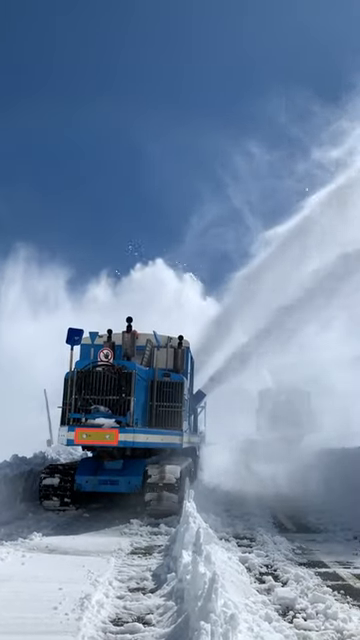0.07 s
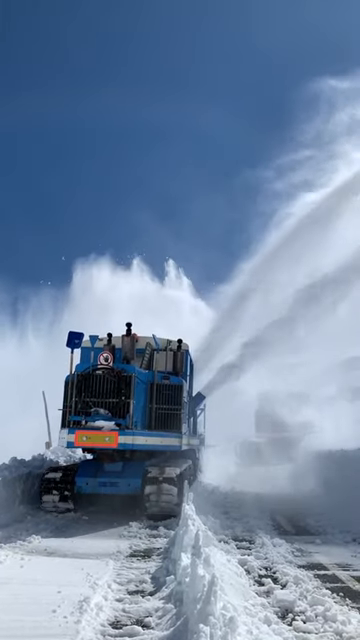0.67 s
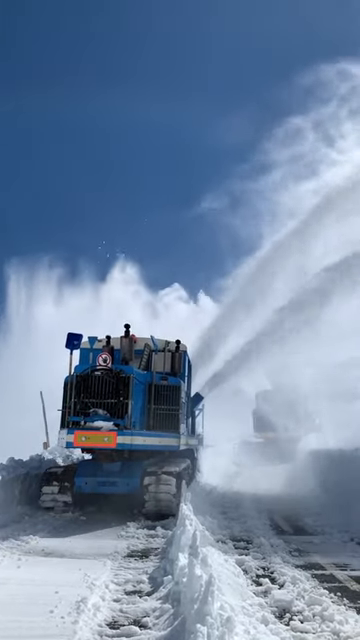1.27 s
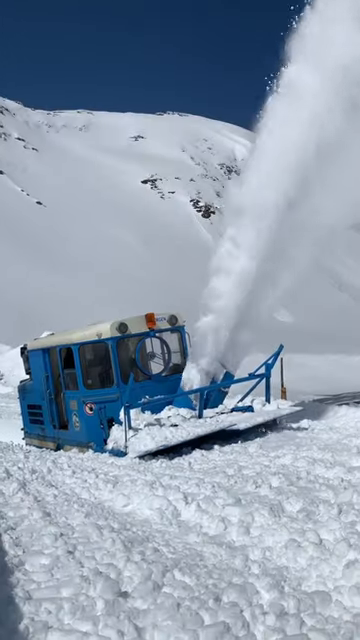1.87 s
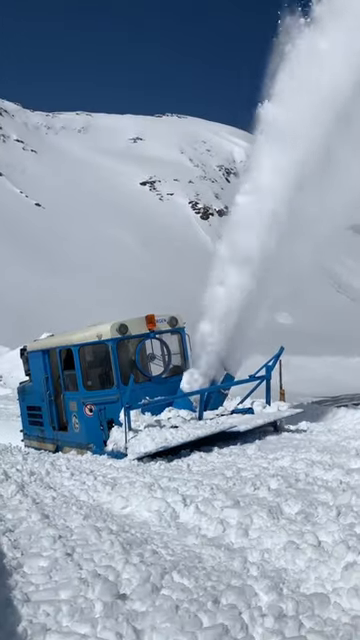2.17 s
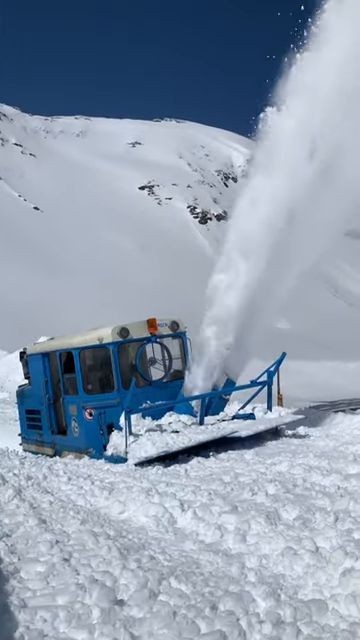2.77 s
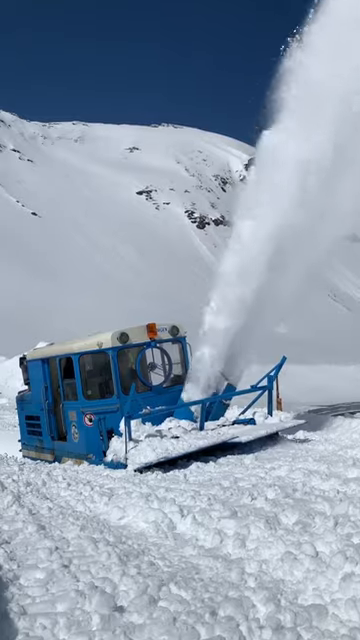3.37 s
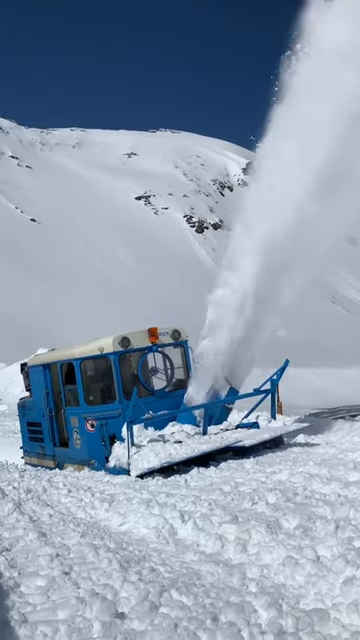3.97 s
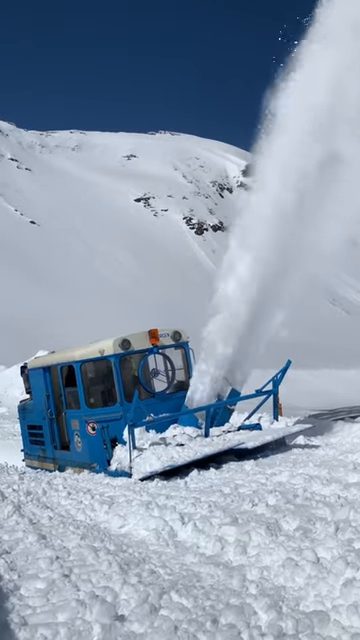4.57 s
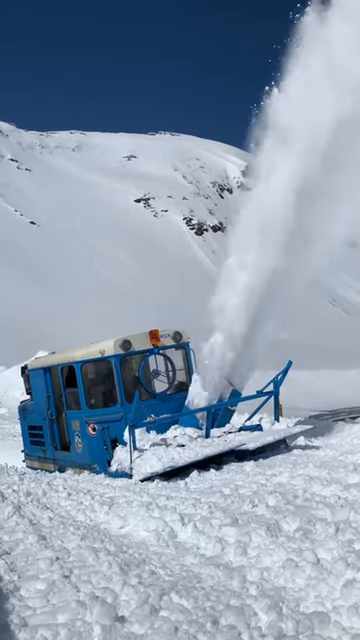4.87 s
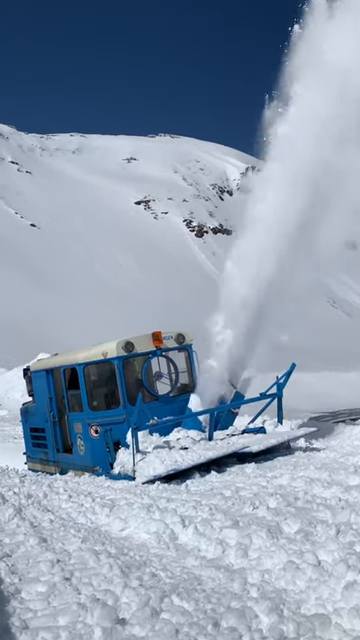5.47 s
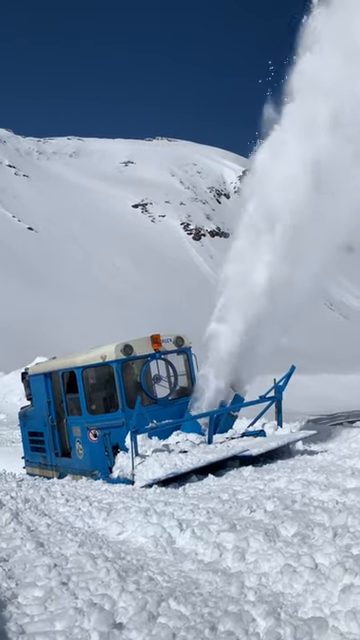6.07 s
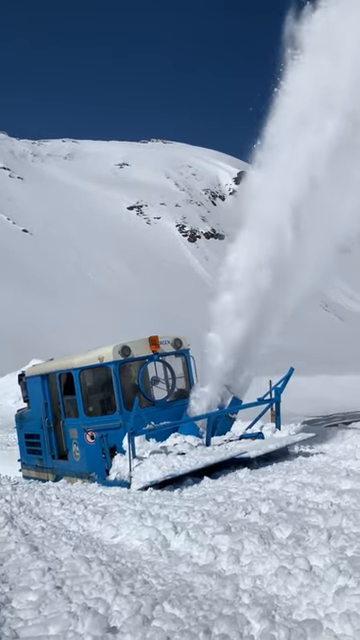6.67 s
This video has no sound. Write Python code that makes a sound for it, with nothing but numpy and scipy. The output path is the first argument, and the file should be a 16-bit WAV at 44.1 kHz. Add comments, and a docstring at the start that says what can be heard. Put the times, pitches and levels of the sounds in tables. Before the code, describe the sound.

Close diesel drone of a working snow blower, rattling and hissing at first, then deeper with a faint whine and dull thuds of snow.

```python
"""Rotary snow blower on a mountain road

A stereo microphone stands close behind the machine, then, after a cut, beside the cab. The blower and
drive diesels throb against a third note of nearly their rate: a third diesel behind, the rotor alongside.
Firings rattle the housing and ring the engine bay, snow churns and hisses, valves patter, gears whir.
Alongside, the rotor chugs once a turn, the fan gear whines and packed snow thuds through the chute."""
import sys
import numpy as np
from scipy import signal
from scipy.fft import rfft, irfft
from scipy.io import wavfile

SR = 44100
rng = np.random.default_rng(int(sys.argv[2]) if len(sys.argv) > 2 else 0)


def pcm_store(signal):
    """Save signal as 16-bit PCM."""
    levels = np.round(np.clip(np.atleast_2d(signal), -1, 1) * 32767)
    wavfile.write(sys.argv[1], SR, levels.astype(np.int16).T)


N = 296352
T = np.arange(N) / SR
FREQS = np.maximum(np.fft.rfftfreq(N, 1 / SR), 1)
CUT_S, PACKED_S = 1.399, 3.41  # the microphone changes place; the drum meets packed snow
CYLINDERS, BLADES = 6, 4
SHARED = np.array([[1], [0]])  # row 0: what both microphone ports share; row 1: what sets them apart


def undb(db):
    """Decibels to gain."""
    return 10 ** (np.asarray(db) / 20)


def unit(x):
    """Scale to rms 1."""
    return x / np.sqrt(np.mean(x ** 2))


def shape(points):
    """Gain at every frequency from (f/Hz, level/dB) points, falling steeply past the last one."""
    hz, db = np.transpose(points)
    return undb(np.interp(np.log(FREQS), np.log(hz), db)) * np.minimum(1, hz[-1] / FREQS) ** 4


def colour(x, gain):
    """Filter by the given gains, then scale to rms 1."""
    return unit(irfft(rfft(x) * gain, N))


def noise():
    """Two unrelated noises: one shared by the ports, one that sets them apart."""
    return rng.standard_normal((2, N))


def walk(rate):
    """Smooth random drift at rms 1 that changes about rate times a second."""
    times = T[::64]
    hz = np.fft.rfftfreq(len(times), times[1])
    spectrum = rfft(rng.standard_normal(len(times))) / (1 + (hz / rate) ** 4)
    return np.interp(T, times, unit(irfft(spectrum, len(times))))


def ring(x, modes):
    """Steep resonances (f/Hz, nominal width/Hz, level/dB) driven by x."""
    return sum(undb(db) * colour(x, 1 / (1 + 1j * (FREQS - hz) / (0.82 * width)) ** 2)
               for hz, width, db in modes)


# Blower, drive and third diesel from behind: firing rate f/Hz, level/dB
REAR_RUNNING = [(80.8, -19.5), (87.78, -18), (85.1, -23)]
def steady():
    """Rate and level of the three diesels running evenly."""
    return [(np.full(N, hz), np.full(N, db)) for hz, db in REAR_RUNNING]


def shaft(hz, db, overtones, in_step_s, waver_db=1.35):
    """The note of one turning part, and its running count of firings or blade passes."""
    count = np.cumsum(hz) / SR
    count -= np.interp(in_step_s, T, count)
    note = undb(db) * np.cos(2 * np.pi * count)
    steady_db = 0.21 * db + 0.86 * np.median(db)  # overtones hold steadier than the fundamental
    for order, order_db in overtones:
        angle = 2 * np.pi * (order * count + rng.random()) + 0.068 * order * walk(2.9)
        note += undb(steady_db + order_db + waver_db * walk(3.1)) * np.cos(angle)
    return np.sqrt(2) * note, count


# Overtones: multiple of the rate, relative level/dB from behind, relative level/dB alongside.
# The fractions come from unequal cylinders, blades and gearing.
BLOWER_OVERTONES = [(1 / 2, -31, -33), (3 / 2, -12, -19.5), (2, -19, -14.5), (5 / 2, -18.5, -41),
                    (6, -41, -37), (8, -30, -37), (28 / 3, -33, -37), (14, -15.5, -38), (15, -19, -41),
                    (31 / 2, -26, -31.5), (51 / 2, -28, -40.5), (31, -25.5, -56)]
DRIVE_OVERTONES = [(1 / 2, -22, -22.5), (5 / 6, -40, -17.5), (3 / 2, -9, -12), (5 / 3, -40, -17),
                   (2, -17, -14.5), (5 / 2, -24, -24.5), (4, -28, -34), (5, -23.5, -32.5),
                   (20 / 3, -24, -39), (7, -29, -27), (15 / 2, -41, -22), (17 / 2, -27, -31.5)]
THIRD_OVERTONES = [(1 / 2, -18, -14), (2 / 3, -10, -3), (5 / 6, -19, -20), (7 / 6, -16, -12),
                   (3 / 2, -8.5, -16), (5 / 3, -17, -20), (7 / 4, -20, -10), (11 / 6, -20, -20),
                   (2, -6, -12), (9 / 4, -24, -13)]
def drone(motions, in_step_s, column):
    """Two diesels beat against a third (behind) or the rotor (alongside); all align at in_step_s."""
    notes, counts = 0, []
    for (hz, db), table in zip(motions, (BLOWER_OVERTONES, DRIVE_OVERTONES, THIRD_OVERTONES)):
        note, count = shaft(hz, db, [(row[0], row[column]) for row in table], in_step_s)
        notes += note
        counts.append(count)
    return notes * SHARED, counts


# Rumble of snow in the drum: f/Hz, relative level/dB
DRUM_SPECTRUM = [(15, -16), (30, -0.5), (50, 7), (75, 6.5), (105, -0.5), (130, 3), (175, 1.5), (215, -9.5),
                 (280, -14.5), (500, -38.5)]
def churning(beats, bite_db, patchy_db):
    """Snow tumbles in the drum, heaviest once in every four beats of the drone's third note."""
    bites_db = bite_db * np.cos(2 * np.pi * beats / 4) + patchy_db * walk(17)
    return colour(noise() * undb(bites_db), shape(DRUM_SPECTRUM))


def knock(firings, depth, fade, alike, uneven_db, scatter_db):
    """Clatter flares at each firing and fades in a share of the gap; the share alike repeats each cycle."""
    index = np.floor(firings).astype(int)
    size_db = uneven_db * np.cos(4 * np.pi * index / CYLINDERS)
    size_db += scatter_db * rng.standard_normal(2048)[index]
    flare = 1 + depth * undb(size_db) * np.exp(-(firings % 1) / fade)
    cycle = (firings + 0.006 * walk(4.7)) / CYLINDERS % 1
    grid = np.arange(3300) / 3300
    patterns = rng.standard_normal((2, len(grid)))
    repeated = unit(np.array([np.interp(cycle, grid, row) for row in patterns]))
    return (np.sqrt(alike) * repeated + np.sqrt(1 - alike) * noise()) * flare


# Rattle of the housing, from behind and alongside: f/Hz, relative level/dB
REAR_RATTLE = [(200, -8), (280, -8.5), (400, 0.5), (520, -5.5), (620, -1.5), (880, -6.5), (1130, -1.5),
               (1350, -2.5), (1580, -13), (1850, -6.5), (2100, -10.5), (2500, -15.5), (3100, -21.5),
               (4500, -40)]
SIDE_RATTLE = [(200, -8.5), (310, -5.5), (450, -0.5), (540, -2), (660, 0.5), (890, -5.5), (1060, -1.5),
               (1230, -1), (1400, -8), (1570, -9.5), (1780, -4), (2060, -7), (2300, -18), (3500, -50.5)]
def housing(engines, spectrum, **clatter):
    """The firings of the given engines shake the housing, which colours their clatter."""
    return colour(sum(knock(firings, **clatter) for firings in engines), shape(spectrum))


# Resonances of the engine bay, open to the rear: f/Hz, nominal width/Hz, level/dB
BAY_MODES = [(3440, 150, -39.5), (4210, 230, -34.5), (6530, 270, -42.5)]
def engine_bay(drive):
    """Every second firing of the drive engine rings the bay; the level flickers."""
    ticks = knock(drive / 2, depth=1.4, fade=0.35, alike=0.05, uneven_db=1.5, scatter_db=0)
    return ring(ticks, BAY_MODES) * undb(1.6 * walk(42))


# Hiss of thrown snow and valve gear, from behind and alongside: f/Hz, relative level/dB
REAR_HISS = [(1500, -3), (2700, 6), (3800, -6), (4600, 2.5), (5400, -0.5), (5900, -1.5), (7500, -4),
             (9000, -1.5), (10500, -10.5), (13000, -16), (15500, -15)]
SIDE_HISS = [(1500, -5.5), (2400, 2.5), (2700, 6.5), (3000, 2), (3350, 4.5), (3800, -0.5), (5500, -2.5),
             (7000, -4.5), (9000, -9), (10500, -13), (12500, -16), (15500, -17.5)]
def snow_and_valves(blower, drive, spectrum, blower_db, drive_db, tick_db, flutter_db, grain_db):
    """Snow hisses; over it valves patter with both engines and an injector ticks once a cycle."""
    sizes = np.minimum(rng.exponential(size=N // 16 + 1), 4)
    grains = noise() * undb(grain_db * np.repeat(sizes, 16)[:N])
    valves_db = sum(db * (np.cos(np.pi * firings) + np.cos(2 * np.pi * firings))
                    for db, firings in ((blower_db, blower), (drive_db, drive)))
    firings_since_tick = (drive - 2.95) % CYLINDERS
    injector_db = tick_db * np.exp(-firings_since_tick / 0.49)
    return colour(grains, shape(spectrum)) * undb(valves_db + injector_db + flutter_db * walk(24))


# Gears and casings, from behind and alongside: f/Hz, nominal width/Hz, level/dB
REAR_GEAR_MODES = [(362, 18, -51), (2086, 36, -40)]
SIDE_GEAR_MODES = [(1204, 18, -53), (1805, 25, -52.5), (2034, 12, -48.5), (3400, 230, -57)]
def gears(modes):
    """Gears whir and their casings ring in narrow bands of noise."""
    return ring(noise(), modes)


# The two microphone ports at each place: f/Hz, left lead/rad, likeness (0-1), left minus right/dB
REAR_PORTS = [(100, 0, 1, 2), (457, -.5, .98, -1), (900, 0, 0.99, 0.5), (1500, 0, 1, 0.5),
              (2110, 0.3, 0.83, 0), (2480, 1, 0, 0), (3000, 2, 0.83, -2), (3580, 0.96, 1, 1),
              (4400, 1, 0.65, 1), (4930, 3.5, 0.9, -0.5), (6250, 4.5, 0.94, 0.5), (8150, 7, 1, 0.5),
              (10100, 7.5, 1, -1), (15500, 14.5, 1, 1)]
SIDE_PORTS = [(100, 0, 0.99, 2), (434, -1, 1, -1), (754, -0.77, 0.9, -2), (940, 0.76, 0.64, -8),
              (1340, -0.8, 1, 0.5), (1650, 0.5, 0.93, 1), (2075, 0, 0.98, -1), (2407, -3, 1, -0.5),
              (3470, -2, 0.39, -0.5), (3960, -5, 0.71, -2.5), (5480, -3, 1, -0.5), (7980, -0.5, 0.74, 0.5),
              (9600, 1, 1, -0.5), (15800, 7, 1, 0.5)]
def microphone(pair, ports):
    """Bass is alike left and right; higher up, the microphone body delays and shades one port."""
    hz, *columns = np.transpose(ports)
    lead, likeness, pan_db = (np.interp(np.log(FREQS), np.log(hz), column) for column in columns)
    pan_db *= 1 - np.exp(-(FREQS / 250) ** 2)
    side = np.array([[1], [-1]])
    shared, apart = rfft(pair)
    both = np.sqrt(1 + likeness) * shared + side * np.sqrt(1 - likeness) * apart
    return irfft(both * np.exp(side * 1j * lead / 2) / np.sqrt(1 + undb(-2 * side * pan_db)), N)


def from_behind():
    """Microphone close to the open engine bay: bright clatter over the drone of three diesels."""
    notes, (blower, drive, third_diesel) = drone(steady(), in_step_s=0.673, column=1)
    churn = undb(-29) * churning(third_diesel, bite_db=1.5, patchy_db=5.5)
    rattle = undb(-23.5 + 0.67 * walk(40)) * housing(
        [blower], REAR_RATTLE, depth=0.76, fade=0.22, alike=0.3, uneven_db=3.5, scatter_db=1.5)
    bay = engine_bay(drive)
    hiss = undb(-34) * snow_and_valves(
        blower, drive, REAR_HISS, blower_db=0.8, drive_db=0.8, tick_db=4, flutter_db=1.5, grain_db=2.5)
    return microphone(notes + churn + rattle + bay + hiss + gears(REAR_GEAR_MODES), REAR_PORTS)


# Blower engine, drive engine and rotor from alongside:
# f/Hz, creep/(Hz/s), lag behind a surge/s, level/dB, swell in packed snow/(dB/s)
SIDE_RUNNING = [(78.75, .02, 0.412, -14.2, -3.6), (87.03, .115, 0, -22.6, 0.1), (90.79, 0.06, 0.42, -36, 0)]
# Surges of speed as the governor answers the snow: t/s, rise/Hz
GOVERNOR_SURGES = [(3.42, 1.5), (5.25, 1.5), (6.2, 1.5)]
def labouring(half_width_s=0.24):
    """Rate and level at work: each part creeps up, follows the surges, swells or fades in packed snow."""
    motions = []
    for hz, creep, lag_s, db, swell in SIDE_RUNNING:
        surges = sum(rise * np.exp(-((T - s - lag_s) / half_width_s) ** 2) for s, rise in GOVERNOR_SURGES)
        motions.append((hz + creep * (T - CUT_S) + surges, db + swell * np.maximum(T - PACKED_S, 0)))
    return motions


def chug(rotor, hz=125, peak_db=-16.5, scatter_db=1, half_length_s=0.0062):
    """Once a turn the rotor shoves its load into the chute: a short, deep thump of varying size."""
    turns = (rotor - 0.613) / BLADES  # the thump falls 0.613 blades into the turn
    nearest = np.round(turns).astype(int)
    away_s = (turns - nearest) / (np.gradient(turns) * SR)
    size = undb(peak_db + scatter_db * rng.standard_normal(512)[nearest])
    return -size * np.cos(2 * np.pi * hz * away_s) * np.exp(-(away_s / half_length_s) ** 2)


# Whine of the fan gear beside the cab: t/s, relative level/dB
WHINE_SWELLS = [(1.42, -39.5), (1.61, -36), (1.66, -55), (2.11, -37), (2.6, -49), (3.0, -40), (3.6, -46.5),
                (3.8, -40), (3.98, -35.5), (4.3, -42), (4.6, -39.5), (5.2, -41), (5.3, -49), (5.42, -37),
                (5.65, -47), (5.9, -50), (6.03, -37), (6.42, -48), (6.6, -39), (6.7, -37)]
def fan_whine(blower, order=16 / 3, gain_db=-0.5):
    """A thin, clean gear tone, locked to the blower engine, fades and returns."""
    db = gain_db + np.interp(T, *np.transpose(WHINE_SWELLS))
    return np.sqrt(2) * undb(db) * np.cos(2 * np.pi * order * blower)


def scrape(hz, spread, soft_hz):
    """Snow shakes the chute around one pitch; it is too soft to give much treble."""
    band = 1 / (1 + (np.log(FREQS / hz) / spread) ** 2) ** 1.5
    return colour(rng.standard_normal(N), band / (1 + (FREQS / soft_hz) ** 2))


# Lumps of packed snow striking the chute: t/s, relative level/dB, thud f/Hz
LUMP_HITS = [(1.65, -8, 149), (3.593, -15.5, 228), (3.607, -10.5, 213), (3.645, -22, 270),
             (3.663, -13, 215), (3.719, -18, 139), (3.7625, -13, 155), (3.853, -14, 238),
             (3.933, -11.5, 160), (3.975, -4, 140), (4.2, -16, 205), (4.459, -6, 142), (4.807, -11.5, 215),
             (5.297, -9, 140), (5.33, -11, 165), (5.586, -13.5, 255), (5.604, -17, 320), (5.63, -11.5, 140),
             (5.686, -3.5, 159), (5.793, -18, 316), (5.832, -10.5, 200), (5.862, -14, 160),
             (5.905, -11.5, 147), (5.966, -23, 288), (6.128, -6.5, 148), (6.17, -16, 230), (6.21, -7, 150),
             (6.386, -14, 142), (6.561, -6.5, 160), (6.563, -16.5, 300), (6.604, -10, 141),
             (6.623, -16, 275)]
def lumps(crumb_hz=290, crumb_db=-12.5, wall_hz=650, wall_db=-14.5, attack_s=0.0027):
    """Each lump lands a dull blow and bursts into crumbs; small hard ones ring the steel wall most."""
    crumbs = undb(crumb_db) * scrape(crumb_hz, spread=0.98, soft_hz=1200)
    out = np.zeros(N)
    for s, db, hz in LUMP_HITS:
        age = np.maximum(T - s, 0)
        blow_fade, crumb_fade, wall_fade = (
            undb(-60 * np.minimum(age / t60_s, 2)) for t60_s in (0.048, 0.066, 0.061))
        hardness = hz / crumb_hz
        blow = blow_fade * np.sin(2 * np.pi * hz * age)
        burst = crumb_fade * hardness * crumbs
        wall = wall_fade * undb(wall_db) * hardness ** 2 * np.sin(2 * np.pi * wall_hz * age)
        out += undb(db) * (1 - np.exp(-age / attack_s)) * (blow + burst + wall)
    return out


# Slabs of snow in the chute: t/s, level/dB, 60 dB fading time/s
SLAB_SLIDES = [(3.6, -32.5, 0.25), (5.755, -31.5, 0.95), (6.53, -31, 0.53)]
def slabs(attack_s=0.006):
    """Slabs scrape through the chute, higher and longer than the lumps."""
    push = np.zeros(N)
    for s, db, t60_s in SLAB_SLIDES:
        age = np.maximum(T - s, 0)
        push += undb(db - 60 * age / t60_s) * (1 - np.exp(-age / attack_s))
    return push * scrape(hz=360, spread=0.85, soft_hz=1500)


def alongside():
    """Microphone beside the cab, screened from the clatter; drum, housing and hiss rise a little with load."""
    notes, (blower, drive, rotor) = drone(labouring(), in_step_s=2.53, column=2)
    load_db = 1.5 * np.clip((T - PACKED_S) / 0.6, 0, 1)  # builds in the packed snow and stays
    churn = undb(load_db - 26.5) * churning(rotor, bite_db=1, patchy_db=1.8)
    rattle = undb(0.23 * load_db - 32) * housing(
        [blower, drive], SIDE_RATTLE, depth=0.46, fade=0.35, alike=0.32, uneven_db=1.5, scatter_db=1.4)
    hiss = undb(0.092 * load_db - 40) * snow_and_valves(
        blower, drive, SIDE_HISS, blower_db=0.4, drive_db=0.2, tick_db=3.5, flutter_db=0.5, grain_db=0.9)
    thuds = (chug(rotor) + lumps() + slabs()) * SHARED
    gearing = gears(SIDE_GEAR_MODES) + fan_whine(blower) * SHARED
    return microphone(notes + churn + rattle + hiss + thuds + gearing, SIDE_PORTS)


def scene():
    """The two microphone places on the road, joined by a hard cut."""
    cut = np.clip((T - CUT_S) / 0.0013, 0, 1)
    return (1 - cut) * from_behind() + cut * alongside()


def record(dry):
    """The recorder cuts the treble steeply above 15.8 kHz."""
    return signal.sosfilt(signal.ellip(8, 0.2, 70, 15800, fs=SR, output="sos"), dry)


dry = scene()
out = record(dry)
pcm_store(out)
```